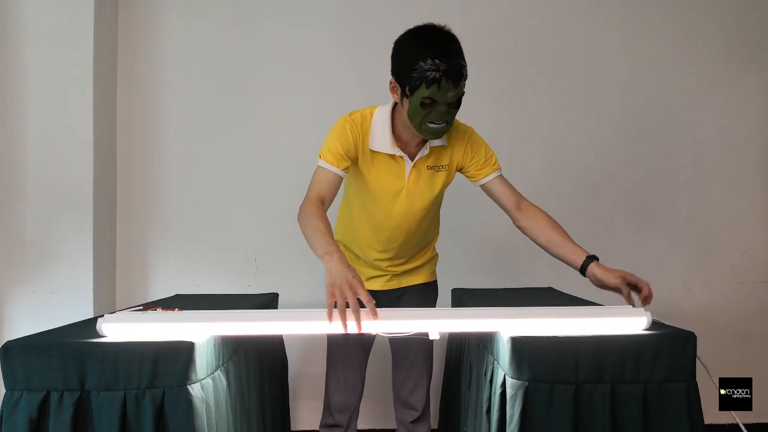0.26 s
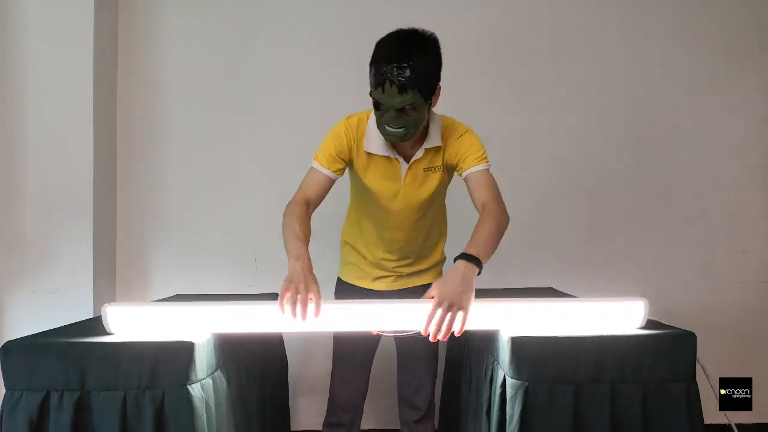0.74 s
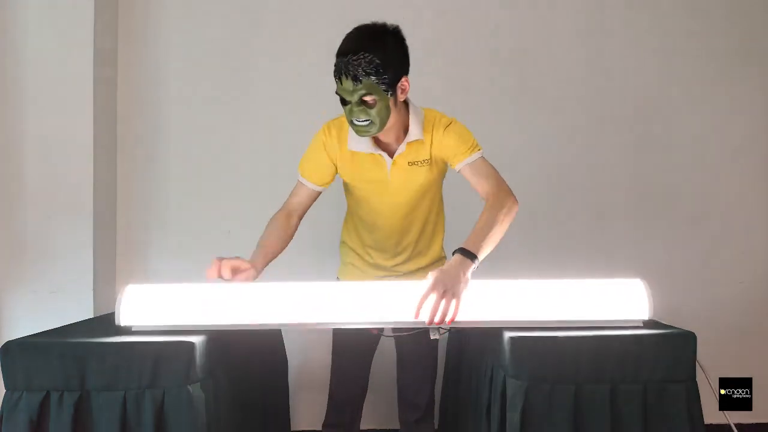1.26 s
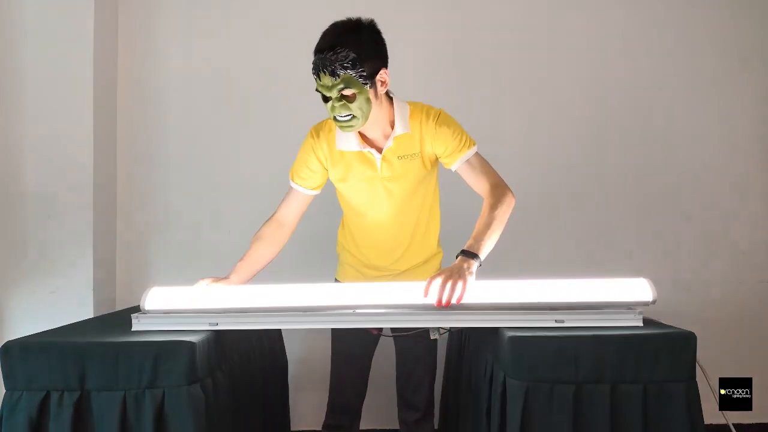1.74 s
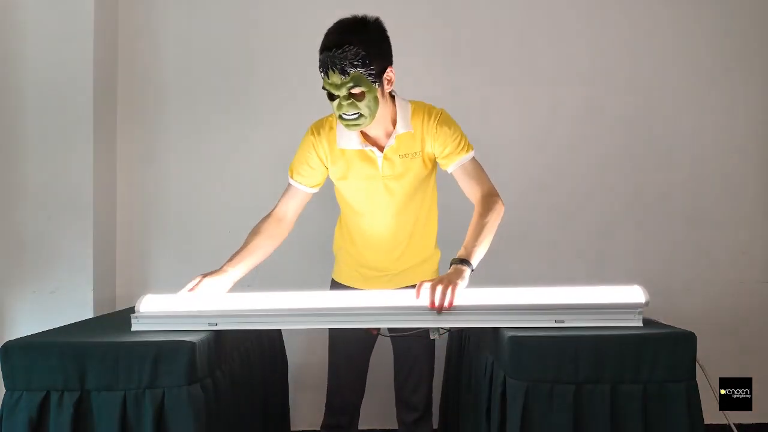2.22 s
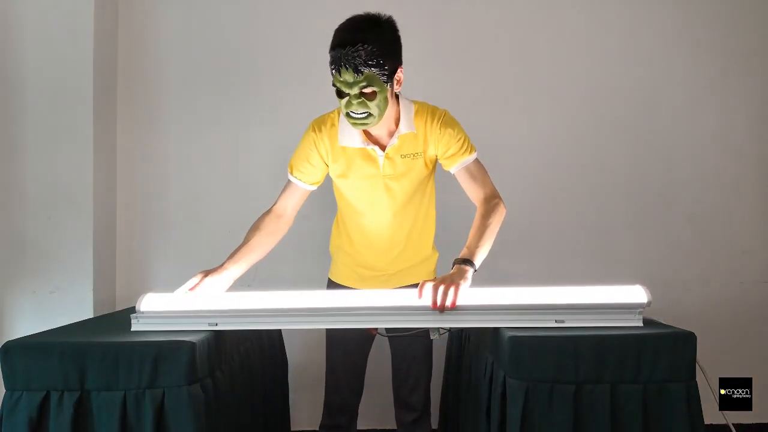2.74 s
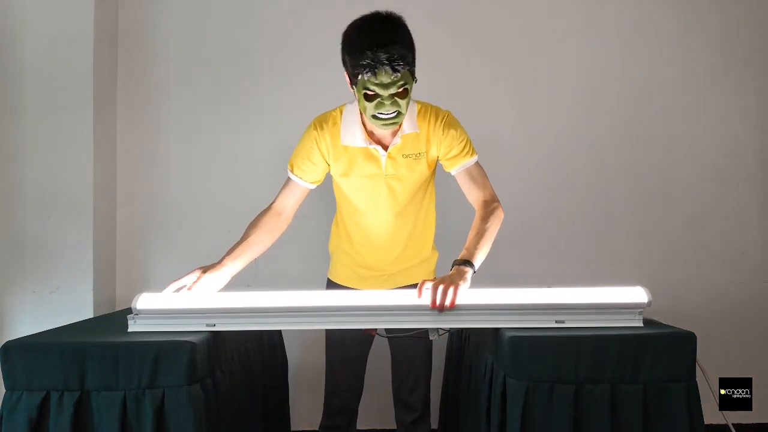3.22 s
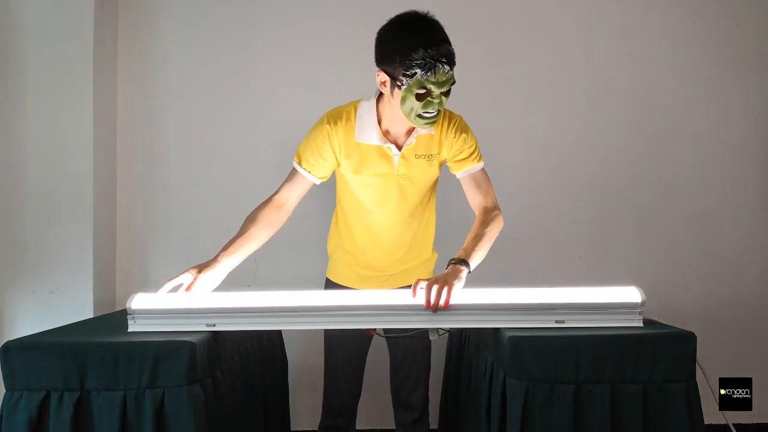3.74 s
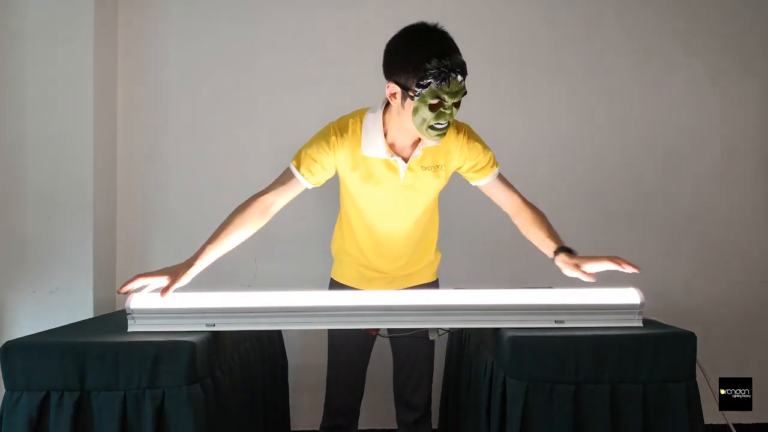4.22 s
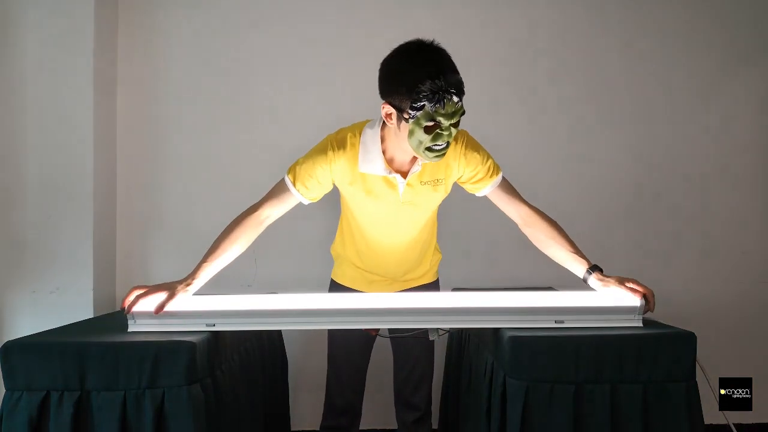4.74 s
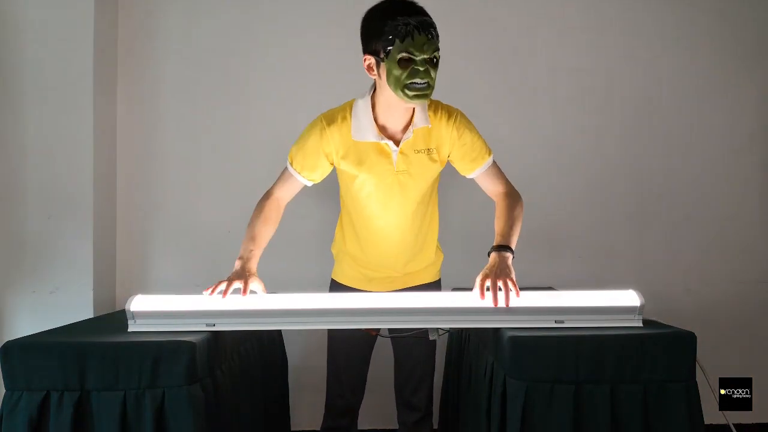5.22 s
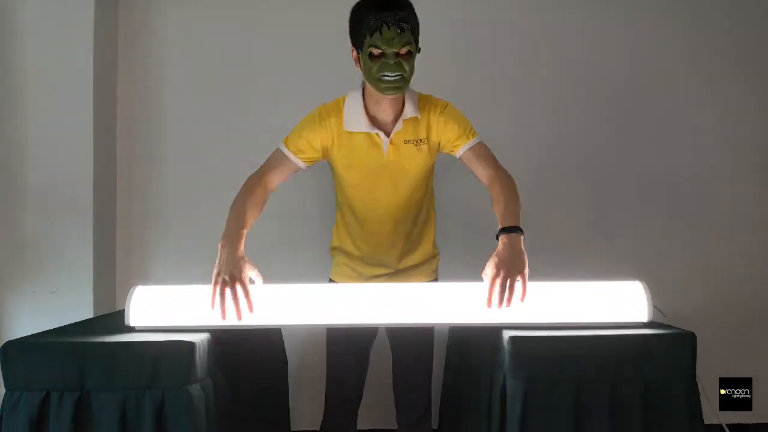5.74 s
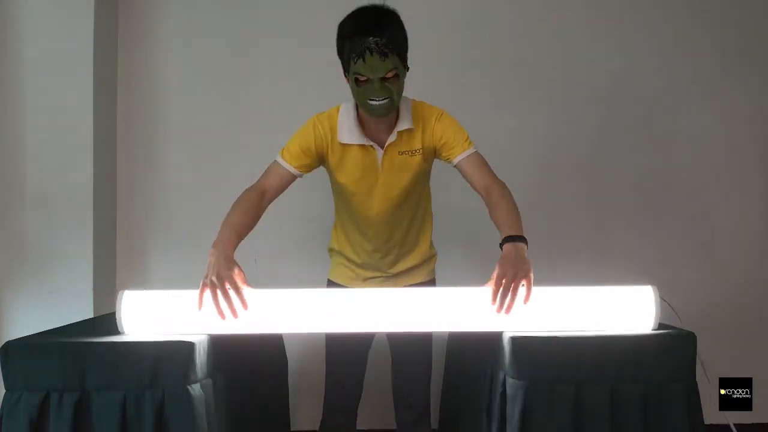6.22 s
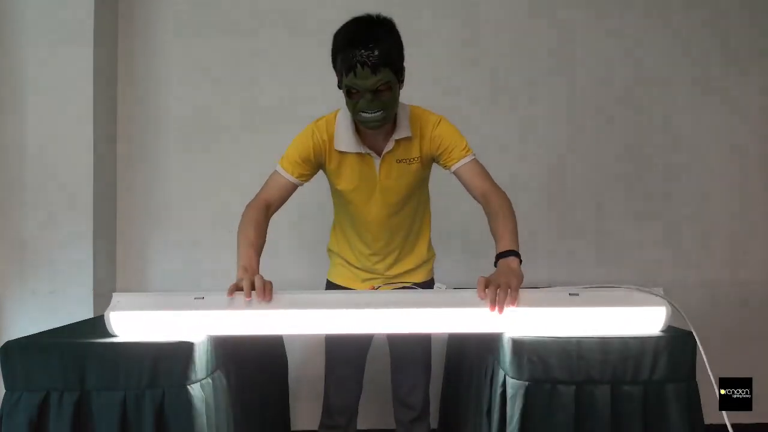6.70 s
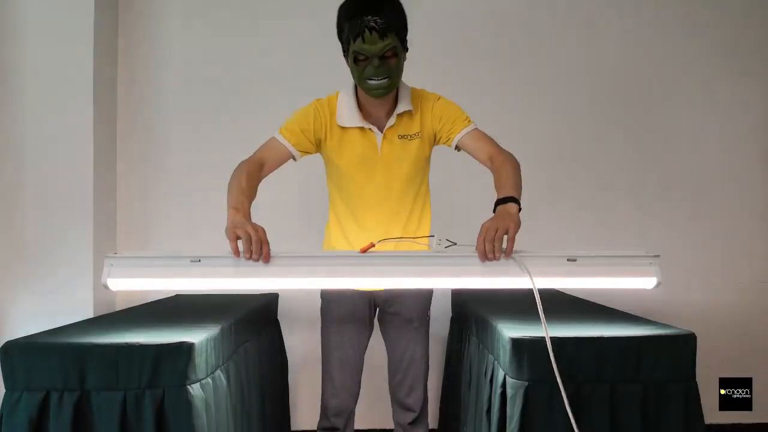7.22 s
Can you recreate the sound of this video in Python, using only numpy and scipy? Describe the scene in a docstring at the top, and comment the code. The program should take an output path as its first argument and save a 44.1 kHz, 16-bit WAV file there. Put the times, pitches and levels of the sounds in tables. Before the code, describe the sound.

A long, thin metal light fixture knocks, rattles and rubs as it is rolled on cloth-covered tables in a bare, echoing room.

```python
"""A long sheet-metal light fixture knocks and rattles as it is rolled over and set down on cloth-covered tables.
Each knock is a dispersed blow plus loose-part rattle, driving the bending modes of the housing.
Friction slips make the rubbing, stick-slip the groan; a table top booms and a small steel part pings.
Beneath lies a wavering rumble and faint hiss. The room is bare and reverberant.
A two-microphone recorder with a noise suppressor hears it from a few metres away."""
import sys
import numpy as np
from scipy import signal
from scipy.fft import rfft, irfft
from scipy.io import wavfile
from scipy.ndimage import uniform_filter1d

SR = 44100
rng = np.random.default_rng(int(sys.argv[2]) if len(sys.argv) > 2 else 0)


def dump_mix(stems):
    """Bounce the given channels to the path in sys.argv[1] as a 16-bit WAV at rate SR."""
    frames = np.atleast_2d(stems).T  # one column per channel
    limited = np.clip(frames, -1, 1)  # hard clip at full scale
    pcm = np.round(limited * 32767).astype(np.int16)
    wavfile.write(sys.argv[1], SR, pcm)


N = 329366  # length in samples


def gain_of(db):
    """Logarithmic level: decibels to an amplitude ratio."""
    return 10 ** (np.asarray(db) / 20)


def unit(x):
    """Energy normalisation: the summed square becomes one, averaged over the channels."""
    energy = np.mean(np.sum(x ** 2, -1))
    return x / np.sqrt(energy + 1e-20)


def read(points, hz):
    """Interpolation of a table along a logarithmic frequency axis."""
    table_hz, value = np.transpose(points)
    return np.interp(np.log(hz + 1), np.log(table_hz + 1), value)


def add(mix, start_s, sound):
    """Superposition: mixes a sound in at its start time."""
    part = mix[max(round(start_s * SR), 0):][:len(sound)]
    part += sound[:len(part)]


def colour(x, points):
    """Minimum-phase filtering: a causal response with the given spectrum keeps attacks sharp."""
    hz = abs(np.fft.fftfreq(8192, 1 / SR))
    log_gain = np.log(gain_of(read(points, hz)))
    # the Hilbert transform of the log gain gives the minimum phase
    spectrum = np.exp(np.conj(signal.hilbert(log_gain)))
    taps = np.fft.ifft(spectrum).real[:4096]
    return np.apply_along_axis(lambda v: signal.oaconvolve(v, taps)[:len(v)], -1, x)


def registers(x):
    """Band splitting: hollow, middle and tinny registers, each of unit energy."""
    split = []
    for hz, kind in [(700, "low"), ([750, 3200], "band"), (3400, "high")]:
        sos = signal.butter(3, hz, kind, fs=SR, output="sos")
        split.append(unit(signal.sosfilt(sos, x)))
    return split


def ring(modes, t, spread_db):
    """Modal superposition: decaying sines, whose weights and signs vary with the place of contact."""
    hz, db, t60_s = np.transpose(modes)[:, :, None]
    db = db + spread_db * rng.standard_normal(hz.shape)
    sign = rng.choice([-1, 1], hz.shape)
    decay = gain_of(db - 60 * t / t60_s)
    return unit((sign * decay * np.sin(2 * np.pi * hz * t)).sum(0))


# Likeness of the sound field at the two microphones: pitch_hz [Hz], coherence [0-1]
COHERENCE = [(60, 1), (130, 1), (260, 0.88), (500, 0), (1000, 0.13), (2000, 0.06), (12000, 0.01)]


def diffuse(pair):
    """Diffuse-field coherence: two unrelated signals are made alike at the microphones in the bass only."""
    a, b = rfft(pair)
    alike = np.clip(read(COHERENCE, np.fft.rfftfreq(pair.shape[1], 1 / SR)), -1, 1)
    right = alike * a + np.sqrt(1 - alike ** 2) * b
    return irfft(np.array([a, right]), pair.shape[1])


# Spectrum of the steady air and building rumble: pitch_hz [Hz], level_db [relative dB per Hz]
AIR_SPECTRUM = [(25, -38.5), (42, 3.5), (71, -11), (90, 2.5), (304, -12.5), (370, -14.5), (429, -18.5),
                (638, -20.5), (740, -20.5), (1370, -21), (1850, -17.5), (3180, -28), (7380, -35),
                (8560, -44.5), (15500, -44.5)]


def air(level_db=-44.5, waver_db=3.4):
    """Filtered noise: low rumble and faint hiss whose level wavers in patches of time and frequency."""
    hz, _, z = signal.stft(diffuse(rng.standard_normal((2, N))), SR, nperseg=2048)
    patches = rng.standard_normal(z.shape[1:])
    patches = uniform_filter1d(patches, size=40, axis=0, mode="wrap")
    patches = uniform_filter1d(patches, size=12, axis=1, mode="wrap")
    z = z * gain_of(read(AIR_SPECTRUM, hz)[:, None] + waver_db * patches / patches.std())
    noise = unit(signal.istft(z, SR, nperseg=2048)[1][:, :N])
    return gain_of(level_db) * np.sqrt(N) * noise  # sqrt(N) turns unit energy into unit RMS


# Reverberation time of the bare room: pitch_hz [Hz], t60_s [s]
REVERBERATION = [(100, 0.8), (350, 0.72), (900, 0.67), (1700, 0.62), (4500, 0.66), (7500, 0.57),
                 (12000, 0.39)]


def room(x, direct_db=-6.5, build_s=0.0024, lag_s=0.0006, echoes_per_s=4000):
    """Reverberation: direct sound, reaching the right microphone first, and a dense tail off bare walls."""
    t = np.arange(SR) / SR
    taps = rng.choice([-1., 1.], (2, SR)) * (rng.random((2, SR)) < echoes_per_s / SR)
    hz, at, z = signal.stft(diffuse(taps * (1 - np.exp(-t / build_s))), SR, nperseg=256)
    decay = gain_of(-60 * at / read(REVERBERATION, hz)[:, None])
    response = unit(signal.istft(z * decay, SR, nperseg=256)[1])
    wet = signal.fftconvolve(x[None], response, axes=1)[:, :N]
    # long waves reach both microphones alike, so only the rest is delayed
    bass = signal.sosfiltfilt(signal.butter(2, 250, fs=SR, output="sos"), x)
    left = bass + np.roll(x - bass, round(lag_s * SR))
    return wet + gain_of(direct_db) * np.array([left, x])


# Modes of the table top: pitch_hz [Hz], level_db [relative dB], t60_s [s]
TABLE_MODES = [(79, -5.5, 0.2), (124, -6, 0.17), (190, -5.5, 0.15)]
# Weight landing on a table: start_s [s], level_db [relative dB]
LANDINGS = [(2.134, -41), (4.677, -60.5), (5.899, -29.5), (6.055, -33)]


def thumps(level_db=34, swell_s=0.0095):
    """Softened impact: cloth slows each landing, so the table-top modes swell into a low boom."""
    out, t = np.zeros(N), np.arange(SR // 2) / SR
    for start_s, db in LANDINGS:
        boom = ring(TABLE_MODES, t, spread_db=2) * (1 - np.exp(-t / swell_s))
        add(out, start_s, gain_of(db + level_db) * boom)
    return out


def groan(hz=334, wander=0.0083, overtone_db=-19, top_s=5.75, top_db=-27,
          swell_db_per_s=171.5, fade_db_per_s=292):
    """Stick-slip: as the edge rolls over cloth, slips lock onto a low mode, a wavering tone that swells and fades."""
    t = np.arange(N) / SR - top_s
    drift = uniform_filter1d(rng.standard_normal(N), size=300)
    phase = 2 * np.pi * np.cumsum(hz * (1 + wander * drift / drift.std())) / SR
    level = gain_of(top_db + np.minimum(swell_db_per_s * t, -fade_db_per_s * t))
    return level * (np.sin(phase) + gain_of(overtone_db) * np.sin(2 * phase))


# Modes of a small steel part, like a spring clip: pitch_hz [Hz], level_db [relative dB], t60_s [s]
CLIP_MODES = [(7300, -5.5, 0.17), (7700, -12, .11), (7620, -0.5, 0.073), (7950, -6.5, 0.017),
              (11020, 3, 0.03), (14500, -3.5, 0.038)]
# Blows that set the part pinging: start_s [s], level_db [relative dB]
PING_TIMES = [(0.334, -57), (3.389, -44.5), (3.937, -28), (4.67, -5.5), (4.687, -19.5), (5.899, -14.5)]


def pings(level_db=14):
    """Modal ringing: a thin, high ring of a small steel part on top of some blows."""
    out, t = np.zeros(N), np.arange(SR // 3) / SR
    for start_s, db in PING_TIMES:
        add(out, start_s, gain_of(db + level_db) * ring(CLIP_MODES, t, spread_db=1))
    return out


# Dense bending modes of the housing taken together: pitch_hz [Hz], level_db [relative dB per Hz]
HOUSING_SPECTRUM = [(60, -21.5), (160, -15), (240, -10.5), (320, 1), (450, -1), (640, -7.5), (850, -1),
                    (1200, 1.5), (1650, 8), (2600, 0), (3300, -12), (4600, -14.5), (6200, -21),
                    (7600, -19.5), (15000, -25.5)]
# Clearest modes of the housing: pitch_hz [Hz], level_db [relative dB], t60_s [s]
HOUSING_MODES = [(308, -3, 0.25), (333.3, -7, 0.23), (400, -1, 0.2), (441, -10.5, 0.2), (793, -16.5, 0.2),
                 (905, -1.5, 0.08), (1447, 0, 0.15), (1685, 1, 0.08), (1709, 15.5, 0.14), (1934, 6.5, 0.27),
                 (2370, 0.5, 0.15), (2720, -4.5, 0.25), (3846, -15.5, .2)]


def housing(force, ring_db=-10):
    """Linear response: a force yields a short broad clack and the ringing of the clearest modes."""
    modes = ring(HOUSING_MODES, np.arange(SR // 3) / SR, spread_db=2)
    ringing = unit(signal.oaconvolve(force, modes)[:len(force)])
    return unit(colour(force, HOUSING_SPECTRUM)) + gain_of(ring_db) * ringing


# Force of one slip of skin or cloth: pitch_hz [Hz], level_db [relative dB per Hz]
SLIP_SPECTRUM = [(180, 14.5), (330, -1.5), (900, 0.5), (1500, -2.5), (2500, -1.5), (4000, 3), (7500, 4.5)]
# Strokes of hands and cloth on the housing: start_s [s], length_s [s], level_db [relative dB],
# hollow_db [low share, relative dB], tinny_db [high share, relative dB]
STROKES = [(0.057, 0.059, -39.5, -18, -7), (0.13, 0.23, -54, -21, -14.5), (0.328, 0.083, -38, -17, -7),
           (0.863, 0.054, -42.5, -18.5, -18), (1.008, 0.18, -68.5, -12, 10.5),
           (1.399, 0.19, -54.5, -16.5, 0.5), (1.572, 0.038, -52.5, -17.5, -12),
           (1.894, 0.13, -38.5, -5, -7.5), (2.042, 0.11, -41, -5.5, -10), (2.157, 0.072, -41, -8.5, -8.5),
           (2.362, 0.34, -57, -2.5, -8), (2.625, 0.094, -51.5, -3.5, 0.5), (2.83, 0.23, -55.5, 2.5, -12.5),
           (3.127, 0.11, -43.5, -5, -11), (3.308, 0.089, -45, -14, -4), (3.801, 0.057, -44.5, -1.5, -11.5),
           (3.845, 0.055, -37.5, -5, -9.5), (4, 0.044, -65.5, -1.5, -16.5), (4.381, 0.16, -56, -1.5, -7.5),
           (4.63, 0.074, -43, 0, -2.5), (5.2, 0.069, -53.5, 8, -2), (5.648, 0.14, -44.5, 2.5, -10),
           (6.95, 0.13, -52, -0.5, -2), (7.127, 0.073, -49.5, -1.5, -13)]


def rubs(level_db=3.5, slips_per_s=1100, spread_db=3.0, skew=0.35, speed_power=0.47):
    """Friction: a stream of tiny uneven slips shakes the housing, louder as the stroke gets faster."""
    sizes = rng.choice([-1, 1], N) * gain_of(spread_db * np.minimum(rng.exponential(1, N), 4))
    slips = sizes * (rng.random(N) < slips_per_s / SR)
    hollow, middle, tinny = registers(housing(colour(slips, SLIP_SPECTRUM)))
    out, t = np.zeros(N), np.arange(N) / SR
    for start_s, length_s, db, hollow_db, tinny_db in STROKES:
        on = (t > start_s) & (t < start_s + length_s)
        # one arch of speed per stroke; a skew of 1 would be even
        speed = abs(np.sin(np.pi * ((t[on] - start_s) / length_s) ** skew))
        sound = middle[on] + gain_of(hollow_db) * hollow[on] + gain_of(tinny_db) * tinny[on]
        out[on] += gain_of(db + level_db) * np.sqrt(N) * speed ** speed_power * sound
    return out


def blow(t, travel_s):
    """Dispersion: bending waves carry the blow's treble ahead of its bass; travel_s is the delay at 1 kHz."""
    hz = np.fft.rfftfreq(len(t), 1 / SR)
    wave = irfft(np.exp(-4j * np.pi * travel_s * np.sqrt(1000 * hz)), len(t))
    return wave * (t < t[-1] / 2)  # drops what wraps around to the end


# Knocks on the housing: start_s [s], force_db [relative dB], hollow_db [low share, relative dB],
# tinny_db [high share, relative dB], panel_hz [note of the struck panel, Hz],
# panel_db [panel share, relative dB], rattle_db [rattle share, relative dB]
KNOCK_EVENTS = [(0.3, -29.5, -20.5, -20.5, 1700, 1, 4.5), (0.334, -32.5, -14.5, -14.5, 2427, -5, 1.5),
                (0.789, -32, -17, -15.5, 2000, -7, 9.5), (0.854, -28.5, -24.5, -24.5, 2050, -17, 13.5),
                (1.893, -24.5, -16, -24, 1600, -7.5, -10), (1.999, -28, -8, -15.5, 1300, -7, -5),
                (2.04, -23.5, -11, -18, 1540, -8.5, 0), (2.129, -24, -11, -22, 900, 1, -0.5),
                (2.606, -25.5, -13, -14.5, 1440, -12.5, -7.5), (2.682, -30, -8, -17, 2060, -7, -10.5),
                (3.084, -29, -13.5, -21.5, 1550, -1.5, -3.5), (3.117, -26, -11.5, -15.5, 1620, -4, -14),
                (3.131, -26.5, -12.5, -22, 1393, -6, -2.5), (3.306, -30, -15, -14, 1550, -10.5, -3),
                (3.387, -33.5, -7, -14, 1560, -8.5, -3), (3.925, -26, -9.5, -10, 1810, -2, -9.5),
                (3.937, -29, -6.5, -15.5, 1770, -8.5, -1), (4.663, -24.5, -6, -10, 1816, -9, 14),
                (4.67, -12, -10.5, -10.5, 1735, -3.5, -5), (4.685, -21, -11.5, -14, 1800, -7.5, -13),
                (5.779, -44, -24.5, -16, 1700, 1, -3.5), (5.896, -14, -10, -9.5, 1577, 3.5, -18),
                (6.214, -39.5, -22.5, -11.5, 1785, -14.5, -15), (6.346, -41, -7.5, -15, 1810, -7.5, -8.5),
                (6.435, -39, -10.5, -22.5, 1783, -13.5, 11), (6.575, -45, -7, -15.5, 2730, -2, 6),
                (7.067, -37.5, -11, -16.5, 1730, -2.5, -3), (7.119, -33.5, -9, -18.5, 1630, -0.5, 16.5)]


def knocks(level_db=26, low_db=8, high_db=11, rattles_per_s=2500, rattle_s=0.0054,
           panel_s=0.00032, crack_db=-1):
    """Impact excitation: a blow and loose-part rattle drive the housing; the panel adds a broad note."""
    out, t = np.zeros(N), np.arange(SR // 2) / SR
    for start_s, db, hollow_db, tinny_db, panel_hz, panel_db, rattle_db in KNOCK_EVENTS:
        grains = rng.standard_normal(len(t)) * (rng.random(len(t)) < rattles_per_s / SR)
        rattle = unit(grains * np.exp(-t / rattle_s))
        force = blow(t, travel_s=0.001039) + gain_of(rattle_db) * rattle
        hollow, middle, tinny = registers(housing(force))
        note = t * np.exp(-t / panel_s) * np.sin(2 * np.pi * panel_hz * t)
        panel = unit(signal.oaconvolve(middle, note)[:len(t)])
        sound = unit(middle + gain_of(panel_db) * panel)
        sound = sound + gain_of(hollow_db + low_db) * hollow + gain_of(tinny_db + high_db) * tinny
        # bare metal on metal: grows fast as the blow gets tinnier
        crack = unit(np.diff(force, prepend=0))
        sound = sound + gain_of(2 * tinny_db + crack_db) * crack
        add(out, start_s, gain_of(db + level_db) * sound)
    return out


# Treble colouring of the handled sounds, a drop above 8 kHz, deepest near 9.7 kHz:
# pitch_hz [Hz], level_db [dB]
TREBLE_COLOUR = [(7900, 0.5), (8500, -18.5), (9700, -22.5), (10600, -15.5), (12500, -18.5), (15000, -18)]


def scene(groan_room_db=-11):
    """Superposition: the fixture in its room, a little to the right, with the pings more direct, over the air."""
    tone = groan()
    handling = knocks() + rubs() + thumps() + gain_of(groan_room_db) * tone
    handled = room(handling) + room(pings(), direct_db=3)
    balance = gain_of([[-.7], [.7]])  # left, right
    return colour(handled + tone, TREBLE_COLOUR) * balance + air()


def record(dry, depth_db=-13, knee_db=11, echo_db=-16, echo_s=0.11, low_hz=38, edge_hz=15600):
    """Spectral suppression: turns down what is near the noise floor or seems a late echo, then limits the band."""
    z = signal.stft(dry, SR, nperseg=512)[2]
    power = uniform_filter1d((abs(z) ** 2).mean(0), size=9, axis=0)
    power = uniform_filter1d(power, size=3, axis=1)
    # smoothed power echo_s earlier; one frame steps 256 samples
    earlier = np.roll(uniform_filter1d(power, size=13, axis=1), round(echo_s * SR / 256), axis=1)
    floor = np.percentile(power, 25, axis=1, keepdims=True)
    knee = floor * gain_of(knee_db) ** 2 + abs(earlier) * gain_of(echo_db) ** 2 + 1e-20
    gain = gain_of(depth_db * knee / (abs(power) + knee))
    quiet = signal.istft(z * gain, SR, nperseg=512)[1][:, :N]
    quiet = signal.sosfilt(signal.butter(6, low_hz, "high", fs=SR, output="sos"), quiet)
    taps = signal.firwin(511, edge_hz, window=("kaiser", 9), fs=SR)
    return signal.oaconvolve(quiet, taps[None], "same")


dry = scene()
out = record(dry)
dump_mix(out)
```